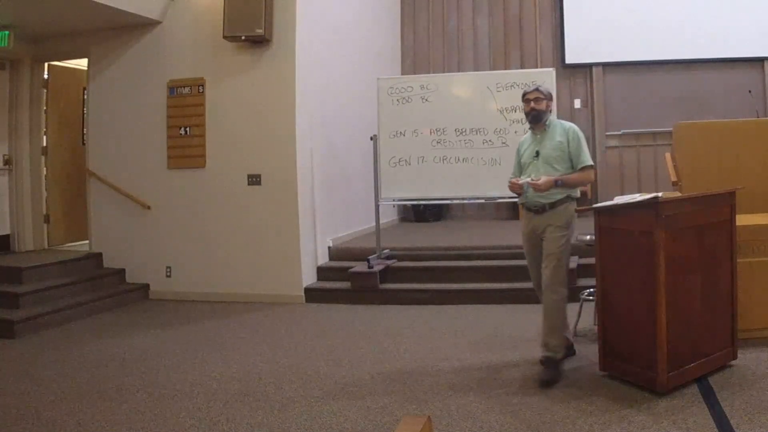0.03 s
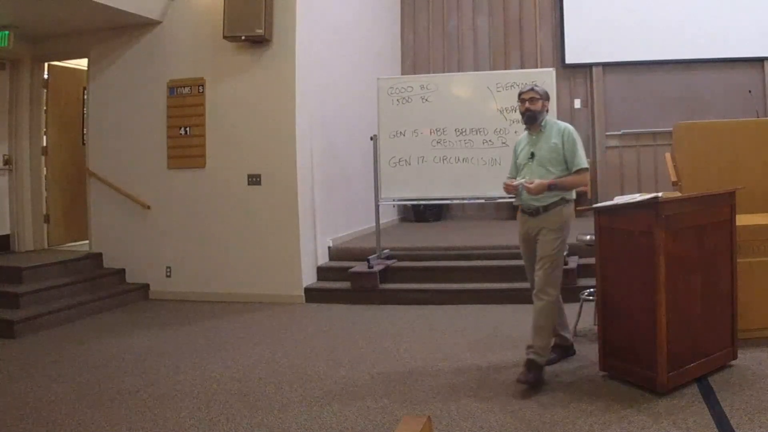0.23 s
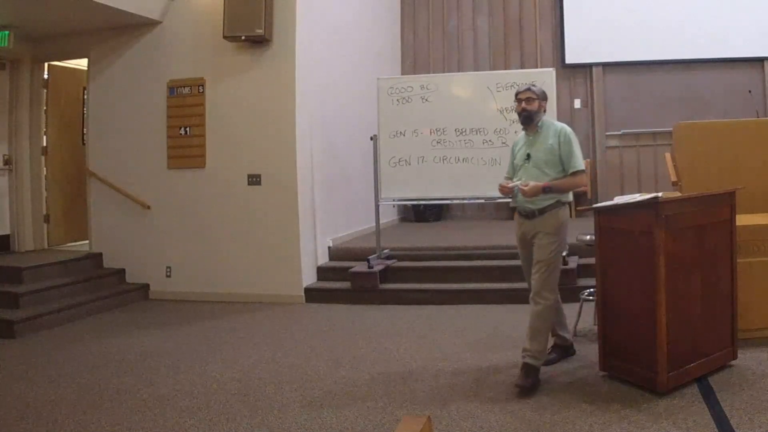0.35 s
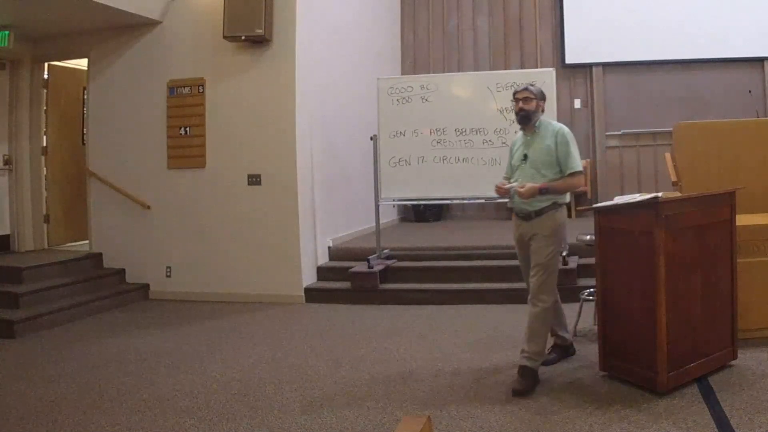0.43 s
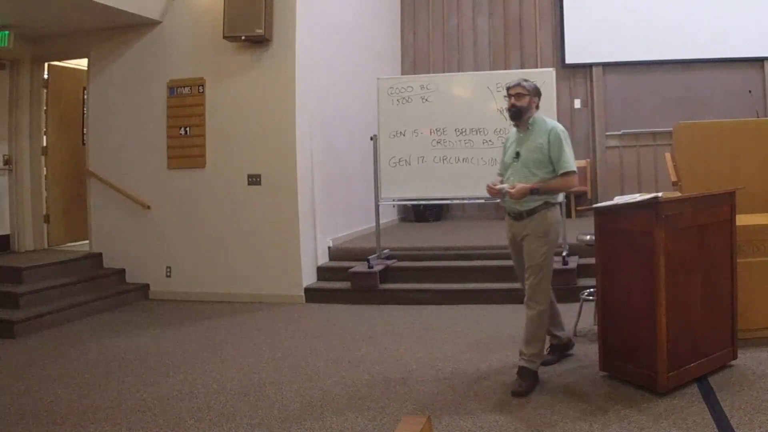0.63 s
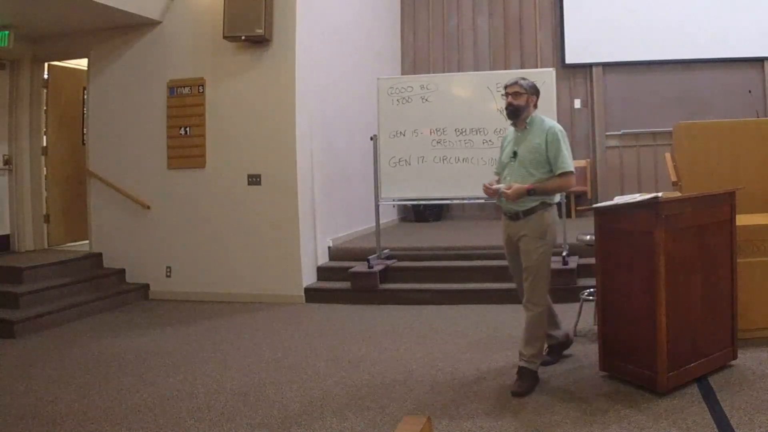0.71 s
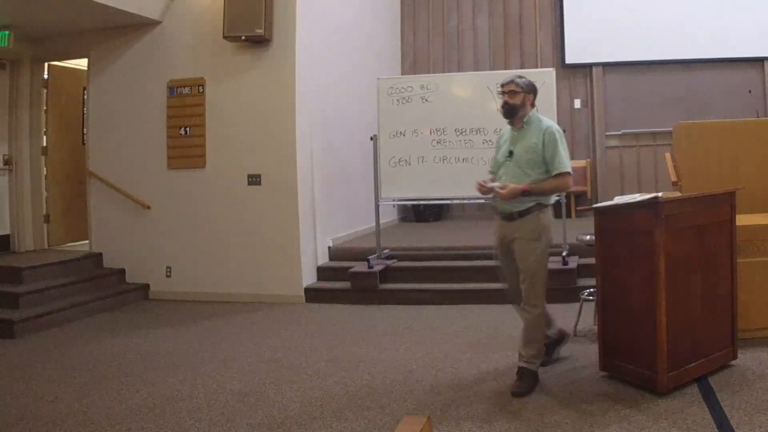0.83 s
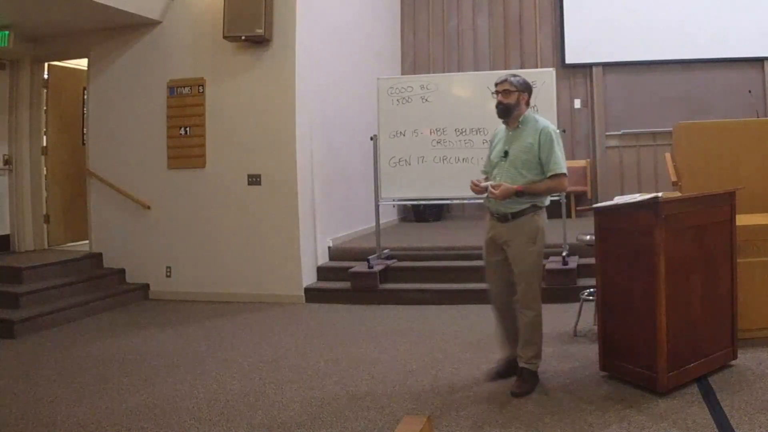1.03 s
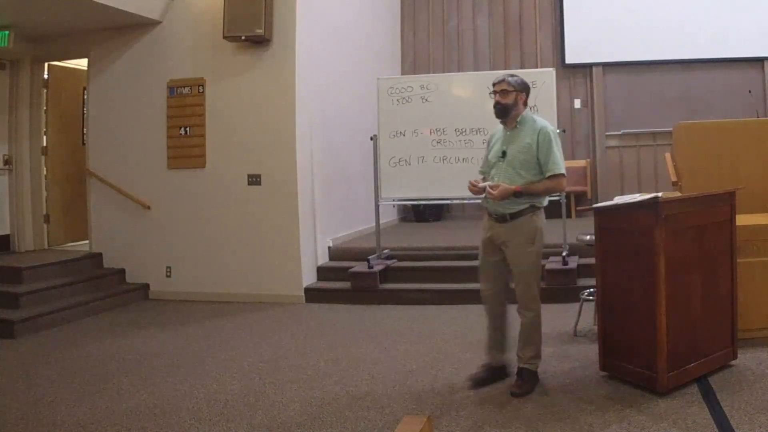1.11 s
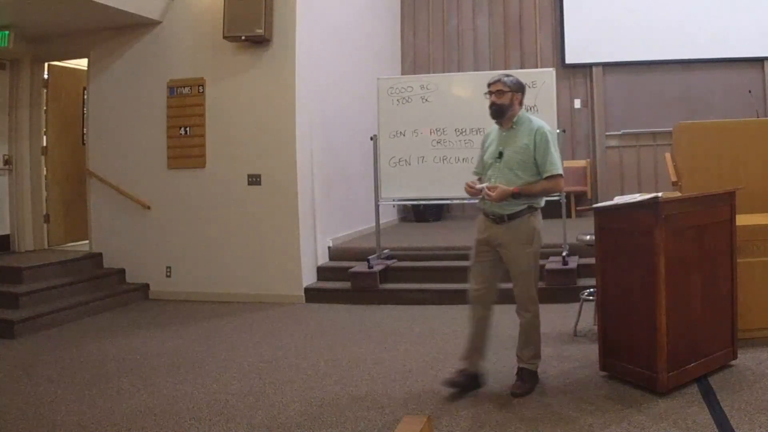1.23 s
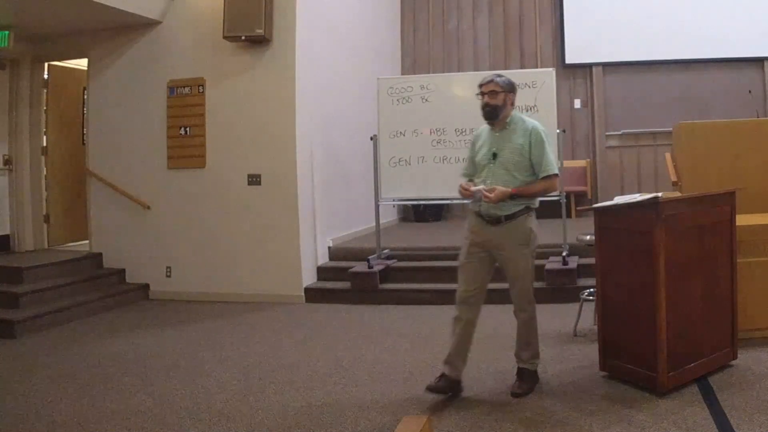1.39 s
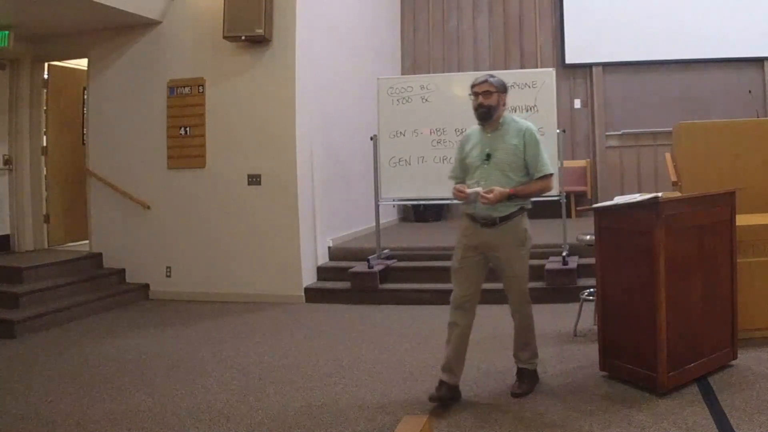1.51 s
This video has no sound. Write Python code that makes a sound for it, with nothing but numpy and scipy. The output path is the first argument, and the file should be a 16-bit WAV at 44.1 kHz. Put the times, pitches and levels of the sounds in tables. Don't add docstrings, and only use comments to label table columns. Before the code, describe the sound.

Muffled footfalls of one walker, low and cushioned, with dull wooden knocks and soft carpet scuffs; tiny fabric ticks later on, over low rumble and faint hiss, a body-worn microphone in a large room.

```python
import sys
import numpy as np
from scipy import signal
from scipy.fft import rfft, irfft
from scipy.io import wavfile
from scipy.ndimage import uniform_filter1d

SR = 44100
rng = np.random.default_rng(int(sys.argv[2]) if len(sys.argv) > 2 else 0)


def invert_db(x):
    u = np.asarray(x, float) / 20
    return 10 ** u


def output_pcm(signal):
    pcm = np.clip(np.atleast_2d(signal).T, -1, 1) * 32767
    wavfile.write(sys.argv[1], SR, np.round(pcm).astype(np.int16))


N = 68355
t = np.arange(N) / SR


def rms_one(x):
    return x / np.sqrt(np.mean(x ** 2) + 1e-20)


def drift(rate_hz):
    step = 40
    pole = np.exp(-2 * np.pi * rate_hz * step / SR)
    warm_up = 2000
    noise = rng.standard_normal(N // step + warm_up + 2)
    slow = signal.lfilter([1], [1, -2 * pole, pole ** 2], noise)[warm_up:]
    return np.interp(np.arange(N) / step, np.arange(len(slow)), rms_one(slow))


def coloured(spectrum, patchy_db):
    hz, db = np.transpose(spectrum)
    f = np.maximum(np.arange(N // 2 + 1) * SR / N, 1)
    shape = invert_db(np.interp(np.log(f), np.log(hz), db)) * (f > hz[0])
    noise = rfft(rng.standard_normal(N)) * shape
    half_octave = (2 * np.log2(f)).astype(int)
    together = drift(2.3)
    out = np.zeros(N)
    for k in range(8, 29):
        flicker_db = patchy_db * (0.84 * together + drift(14.0))
        out += irfft(noise * (half_octave == k), N) * invert_db(flicker_db)
    return rms_one(out)


def bandpass(x, low_hz, high_hz):
    return signal.sosfilt(signal.butter(2, [low_hz, high_hz], "band", fs=SR, output="sos"), x)


def bell(centre_s, half_s):
    return np.exp(-((t - centre_s) / half_s) ** 2)


# (frequency [Hz], density [dB per Hz])
RUMBLE_SPECTRUM = [(13, -29.5), (22, -0.5), (43, 3.5), (70, -5.5), (152, -13.5), (195, -19), (252, -22),
                   (310, -23), (400, -31.5), (520, -70), (880, -120)]
# (time [s], level [dB])
BODY_STIR = [(0.0, -63.5), (0.504, -65.5), (0.616, -70), (1.252, -69), (1.55, -68.5)]


def rumble():
    stir_db = np.interp(t, *np.transpose(BODY_STIR))
    level_db = -55.5 + stir_db - stir_db.mean()
    return invert_db(level_db) * coloured(RUMBLE_SPECTRUM, patchy_db=0.5)


# (frequency [Hz], density [dB per Hz])
HISS_SPECTRUM = [(250, -29.5), (350, -3), (495, -2.5), (1080, -8), (1240, -12), (1830, -17.5), (3500, -22),
                 (12000, -26), (16000, -29)]


def hiss():
    return invert_db(-75.5) * coloured(HISS_SPECTRUM, patchy_db=0.2)


# (frequency [Hz], rms level [dB])
WHINE_TONES = [(2821, -106), (3182, -106)]


def whines():
    return sum(np.sqrt(2) * invert_db(db) * np.sin(2 * np.pi * hz * t) for hz, db in WHINE_TONES)


# (time [s], peak level [dB], centre frequency [Hz], length [s])
CLOTH_TICKS = [(.106, -95, 2500, .006), (0.349, -78, 2360, 0.0074), (0.638, -76, 1970, .006),
               (1.086, -73.5, 2260, 0.0023), (1.099, -74.5, 3770, 0.0088), (1.095, -75.5, 7200, 0.0077),
               (1.232, -76, 2300, 0.0051), (1.269, -68, 5800, 0.0023), (1.272, -68.5, 5250, .003),
               (1.27, -76, 9600, 0.0027), (0.47, -76, 6100, .004), (.467, -75, 3500, 0.0042)]


def cloth_ticks():
    band_ratio = 1 + 1 / 5.5
    out = np.zeros(N)
    for s, db, hz, length in CLOTH_TICKS:
        burst = rng.standard_normal(N) * bell(s, length / 2)
        burst = bandpass(burst + 1e-18, hz / band_ratio, hz * band_ratio)
        out += invert_db(db) * burst / np.abs(burst).max()
    return out


# (centre time [s], level [dB], half length [s], lowest frequency [Hz])
CLOTH_SLIDES = [(0.23, -92, 0.012, 10900), (0.348, -88, 0.069, 7100), (0.478, -85, 0.022, 6000),
                (0.95, -90, 0.046, 8900), (1.04, -89.5, 0.033, 11100), (1.103, -85.5, 0.068, 2530),
                (1.16, -89, 0.033, 13000), (1.21, -90, 0.31, 1490), (1.266, -89, 0.029, 8000),
                (1.38, -84.5, 0.063, 8060), (1.47, -90.5, 0.069, 10300)]


def cloth_slides():
    out = np.zeros(N)
    for s, db, half, low_hz in CLOTH_SLIDES:
        rustle = bandpass(rng.standard_normal(N), low_hz, min(4 * low_hz, 19000))
        waver_db = 1.3 * drift(27.0)
        out += invert_db(db + waver_db) * rms_one(rustle) * bell(s, half)
    return out


# (centre time [s], level [dB], half length [s], top frequency [Hz])
CARPET_SCUFFS = [
    (0.192, -73.5, 0.019, 374),
    (0.298, -68, 0.018, 360),
    (0.589, -72.5, 0.0066, 483),
    (0.642, -54, .02, 115),
    (0.784, -65.5, 0.043, 153),
    (0.899, -66.5, 0.013, 338),
    (0.934, -68, 0.035, 297),
    (1.483, -71.5, 0.044, 288),
]


def scuffs():
    out = np.zeros(N)
    for s, db, half, top_hz in CARPET_SCUFFS:
        puff = bandpass(rng.standard_normal(N), 82.3, top_hz)
        out += invert_db(db) * rms_one(puff) * bell(s, half)
    return out


def swings(rows, turns):
    sharpness = 4.48
    out = np.zeros(N)
    for (s, db, hz, rise), turn in zip(rows, turns):
        u = np.clip((t - s) / rise + 1, 0, 30)
        envelope = (u * np.exp(1 - u)) ** sharpness
        out += invert_db(db) * envelope * np.cos(2 * np.pi * (hz * (t - s) + turn))
    return out


# (peak time [s], peak level [dB], frequency [Hz], rise [s])
BOARD_KNOCKS = [(.013, -51, 95, 0.021), (.029, -70, 154, .012), (.131, -58, 122, 0.0099),
                (.175, -60.5, 180, 0.011), (.202, -58.5, 245, 0.01), (.206, -61.5, 327, 0.0079),
                (.295, -57.5, 222, 0.0089), (.314, -65, 305, 0.02), (.386, -60, 189, 0.02),
                (.436, -49, 115, 0.025), (.436, -59.5, 169, 0.019), (.509, -54, 117, 0.017),
                (.556, -54.5, 96, 0.03), (.592, -50, 191.7, 0.016), (.593, -53, 244, .009),
                (.594, -61.5, 337, 0.0075), (.741, -61, 106, 0.05), (.855, -63, 143.6, 0.058),
                (.902, -49, 95, 0.01), (.907, -49, 163, 0.018), (.906, -54.5, 319, 0.012),
                (.945, -56.5, 185, 0.032), (.999, -59.5, 128, 0.0084), (1.038, -65, 316, 0.01),
                (1.050, -61, 233, 0.0083), (1.207, -70, 317, 0.014), (1.210, -62.5, 193, 0.014),
                (1.249, -60, 107, 0.013), (1.466, -59, 183, 0.0066), (1.489, -59.5, 90.4, .016)]


def knocks():
    return swings(BOARD_KNOCKS, rng.random(len(BOARD_KNOCKS)))


# (crest time [s], peak level [dB], frequency [Hz], rise [s])
FLOOR_THUMPS = [(0.024, -48, 44.4, 0.028), (.086, -42, 51.2, 0.031), (.147, -48, 52.8, 0.022),
                (.222, -47, 42, 0.032), (0.272, -52.5, 49.6, 0.033), (.324, -53, 36, 0.018),
                (.385, -41, 44.2, 0.034), (0.456, -26, 43.8, 0.037), (.510, -35, 50, 0.014),
                (.530, -37.5, 43.8, 0.03), (.552, -43.5, 43.7, 0.018), (.597, -38, 59.4, 0.011),
                (.625, -29, 46.4, 0.02), (.666, -37.5, 36.6, 0.014), (.693, -39, 39.5, 0.011),
                (.755, -57, 54, 0.037), (.914, -38.5, 64.7, .014), (.935, -42, 54.2, 0.045),
                (.977, -43, 43, 0.012), (1.021, -39.5, 46.5, 0.013), (1.041, -43, 44.8, 0.025),
                (1.075, -47.5, 49.2, 0.034), (1.132, -60, 48, .015), (1.208, -48, 52, 0.017),
                (1.259, -55, 60, .02), (1.323, -54, 50.3, 0.014), (1.375, -55, 46.6, 0.023),
                (1.436, -51, 43.8, 0.0096), (1.479, -43.5, 60.7, 0.015)]


def thumps():
    return swings(FLOOR_THUMPS, np.zeros(len(FLOOR_THUMPS)))


def scene():
    background = rumble() + hiss() + whines()
    clothing = cloth_ticks() + cloth_slides()
    walking = scuffs() + knocks() + thumps()
    return (background + clothing + walking)[None]


TREBLE_EDGES = [12780, 13500, 14200, 15000, 15780]


def starved_treble(x):
    frame = 1024
    f = np.arange(N // 2 + 1) * SR / N
    spectrum = rfft(x)
    frame_of = np.arange(N) // frame
    out = irfft(spectrum * (f < TREBLE_EDGES[0]), N)
    for low, high in zip(TREBLE_EDGES, TREBLE_EDGES[1:]):
        band = irfft(spectrum * (f >= low) * (f < high), N)
        power = uniform_filter1d(band ** 2, size=2 * frame)[frame // 2::frame]
        level_db = 10 * np.log10(power + 1e-20)
        waver_db = 0.8 * rng.standard_normal(len(level_db))
        threshold_db = np.percentile(level_db, 25) + 2.3 + waver_db
        gate = np.where(level_db > threshold_db, 1, invert_db(-19.0))
        gate = gate[np.minimum(frame_of, len(gate) - 1)]
        out += band * uniform_filter1d(gate, size=frame // 2)
    return out


def band_limit(x):
    return signal.sosfilt(signal.butter(12, 15850, fs=SR, output="sos"), x)


def record(dry):
    fade_s = 0.004
    edge_s = np.minimum(np.arange(N), np.arange(N)[::-1]) / SR
    lows = signal.sosfiltfilt(signal.butter(2, 300, fs=SR, output="sos"), dry[0])
    faded = dry[0] - lows * (1 - np.tanh(edge_s / fade_s))
    return band_limit(starved_treble(faded)[None])


dry = scene()
out = record(dry)
output_pcm(out)
```